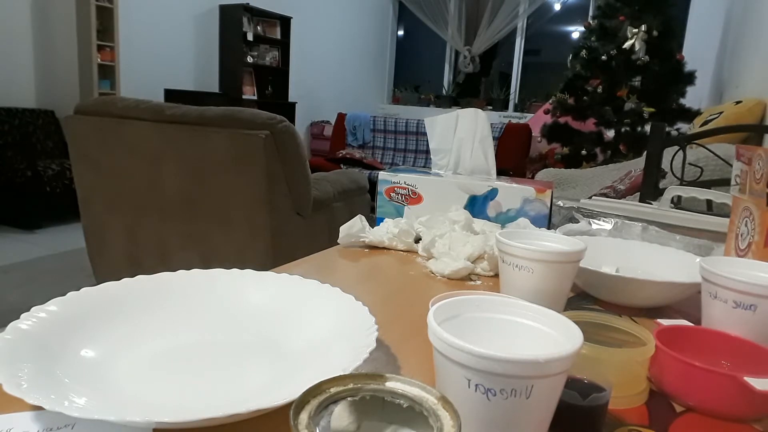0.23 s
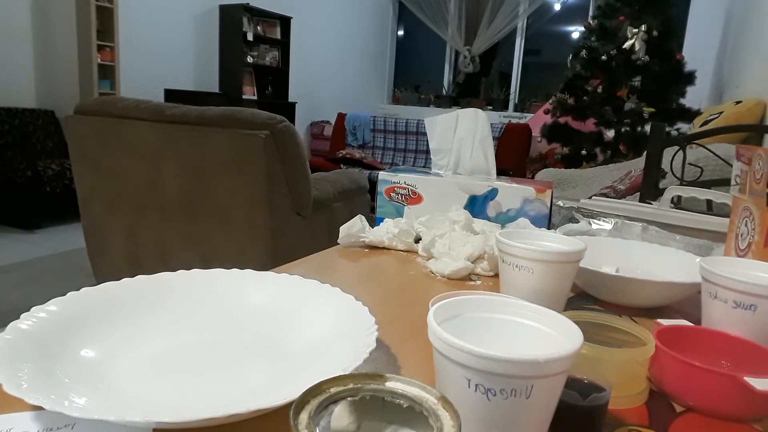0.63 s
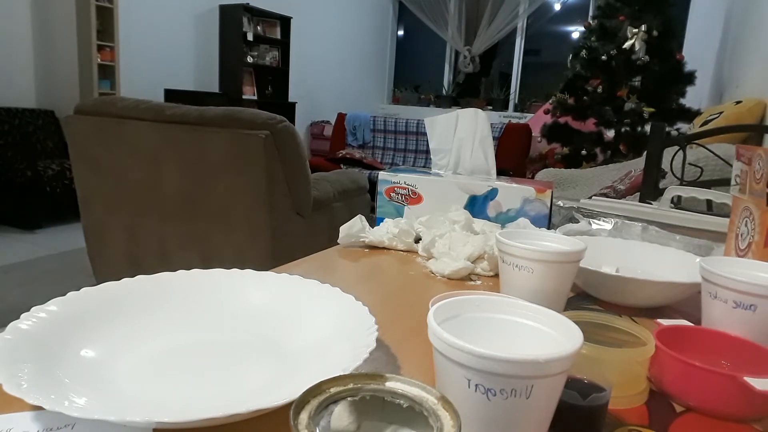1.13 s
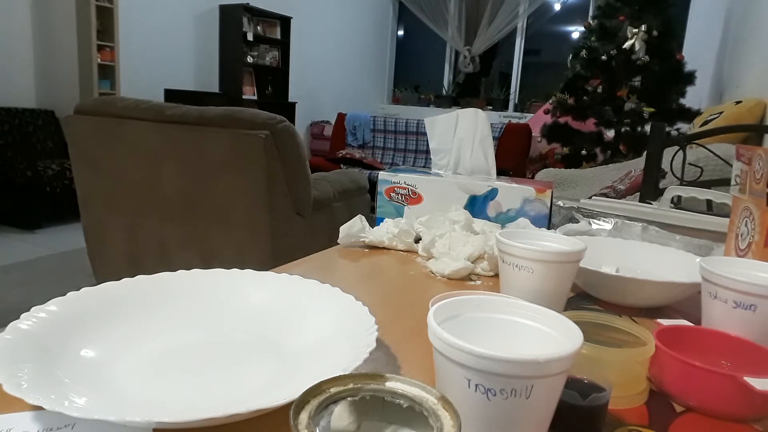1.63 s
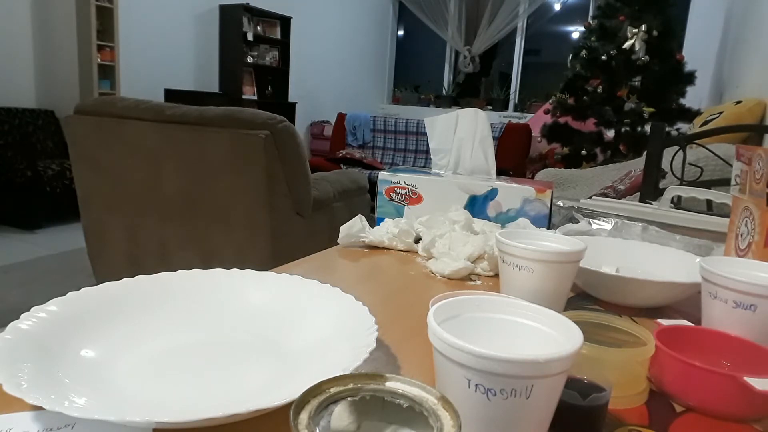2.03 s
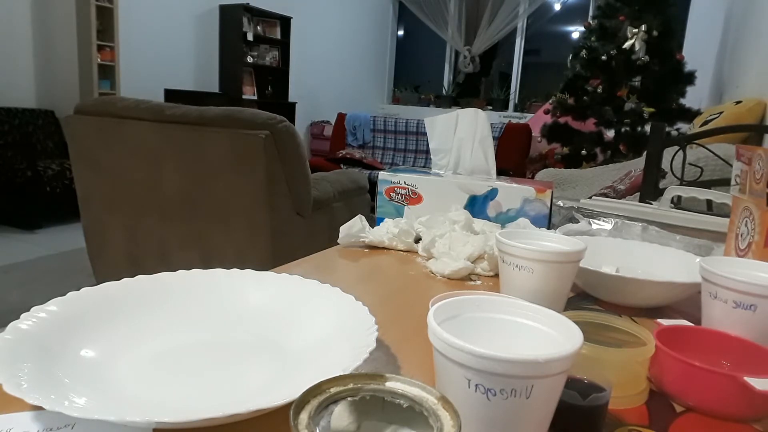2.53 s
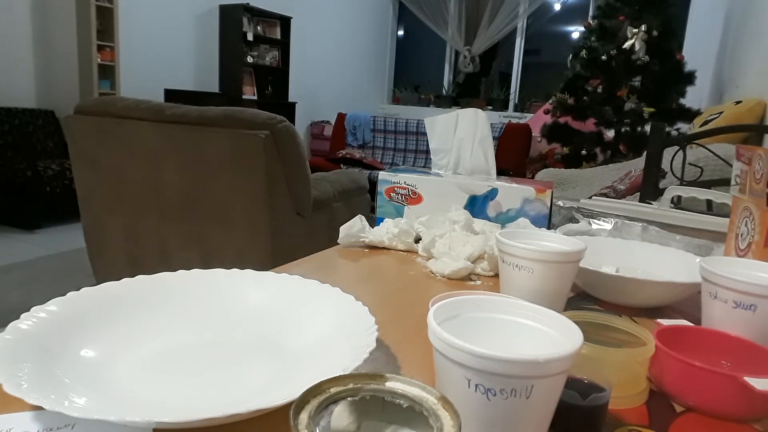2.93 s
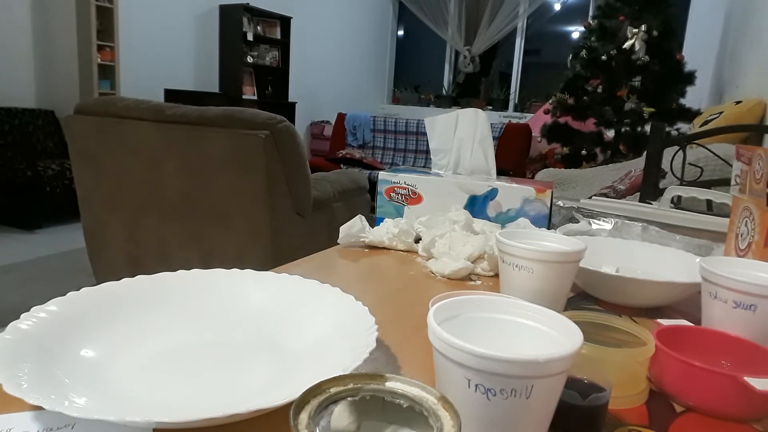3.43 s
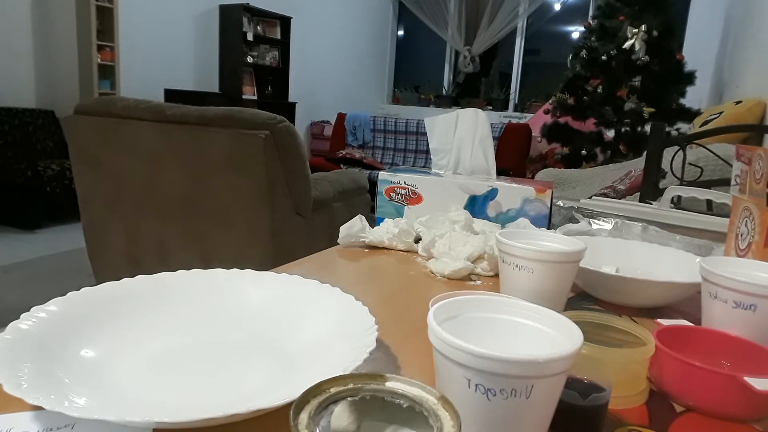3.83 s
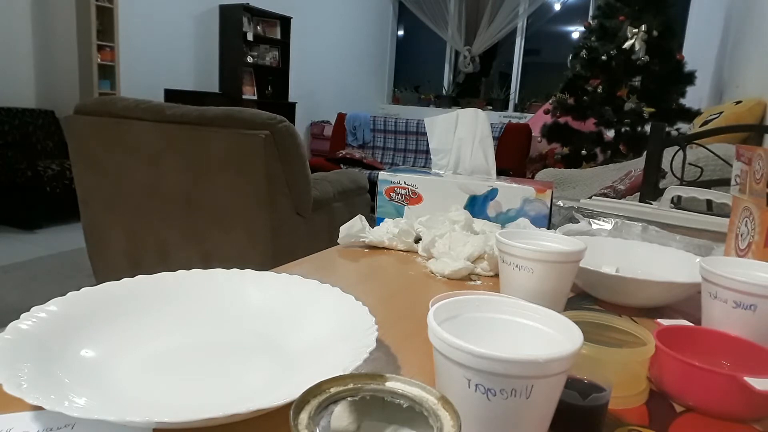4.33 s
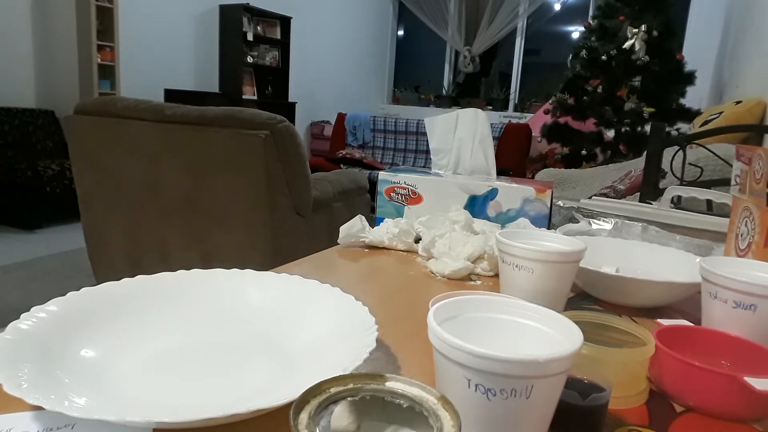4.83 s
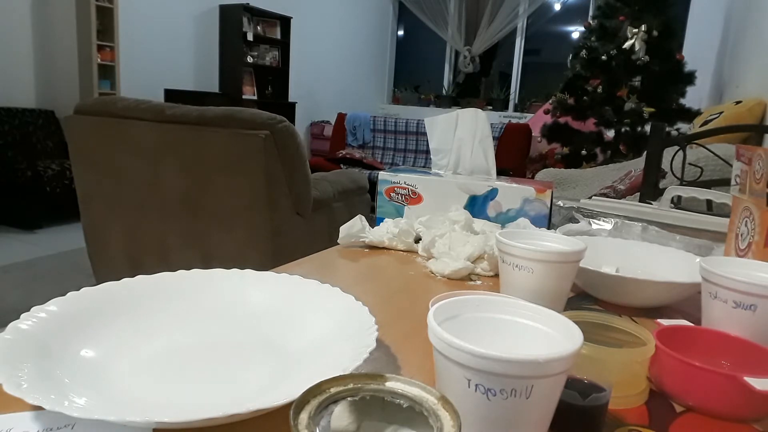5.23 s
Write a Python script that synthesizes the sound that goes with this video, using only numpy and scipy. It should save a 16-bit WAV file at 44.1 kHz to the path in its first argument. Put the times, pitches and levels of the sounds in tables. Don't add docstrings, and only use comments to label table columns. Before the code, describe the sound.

A still microphone in a furnished home room picks up faint rumble and hiss. A loose metal part clinks, something pushes the door softly, the handle clicks, and the door slams hard with a quick double strike and woody boom. After it, light knocks give way to irregular shoe steps, with sliding soles, chafing tones and crisp grit snaps, plus a late faint clink.

```python
import sys
import numpy as np
from scipy import signal
from scipy.fft import rfft, irfft, next_fast_len
from scipy.io import wavfile
from scipy.ndimage import uniform_filter1d, map_coordinates

SR = 44100
rng = np.random.default_rng(int(sys.argv[2]) if len(sys.argv) > 2 else 0)


def log_audio(samples):
    frames = np.atleast_2d(samples).T
    limited = np.clip(frames, -1, 1)
    pcm = np.round(limited * 32767).astype(np.int16)
    wavfile.write(sys.argv[1], SR, pcm)


def convert_level_to_amplitude(level_db):
    exponent = np.asarray(level_db, float) / 20
    return 10 ** exponent


N = 241957
LONG = 28000
WHOLE = next_fast_len(N)
HZ = np.fft.rfftfreq(WHOLE, 1 / SR)


def unit(x):
    return x / np.sqrt(np.mean(x ** 2) + 1e-20)


def along(points, hz):
    f, v = np.transpose(points)
    return np.interp(np.log(hz + 1), np.log(f + 1), v)


def coloured(x, points):
    gain = convert_level_to_amplitude(along(points, np.fft.rfftfreq(4096, 1 / SR)))
    cepstrum = irfft(np.log(gain + 1e-6))
    cepstrum[1:2048] *= 2
    cepstrum[2049:] = 0
    impulse = irfft(np.exp(rfft(cepstrum)))
    return signal.fftconvolve(x, impulse)[:len(x)]


def shaped(x, gain):
    return irfft(rfft(x, WHOLE) * gain, WHOLE)[..., :N]


def wobble(rate):
    knots = rng.standard_normal(int(N * rate / SR) + 4)
    return map_coordinates(knots, [np.arange(N) * rate / SR])


def swell_in(rise):
    return 1 - np.exp(-np.arange(LONG) / SR / rise)


def add(track, s, x):
    track[round(s * SR):][:len(x)] += x


def roomed(x, wet_db, rise=0.0023, size=0):
    # (frequency [Hz], t60 [s])
    room_t60 = [(70, 1), (250, 0.97), (1000, 0.68), (3000, 0.69), (6000, 0.56), (10000, 0.39),
                (15000, 0.42)]
    hz, t, z = signal.stft(rng.standard_normal(LONG), SR, nperseg=256)
    decay = convert_level_to_amplitude(-60 * t / along(room_t60, hz)[:, None])
    tail = signal.istft(z * decay, SR, nperseg=256)[1][:LONG]
    tail = tail * (1 - np.exp(-np.arange(len(tail)) / SR / rise))
    tail = convert_level_to_amplitude(wet_db) * tail / np.linalg.norm(tail)
    if size:
        colour = np.sqrt(np.abs(uniform_filter1d(np.abs(rfft(x)) ** 2, size)))
        return x + irfft(colour * rfft(tail), LONG)
    return x + signal.fftconvolve(x, tail)[:len(x)]


def burst(points, t60, rise, click=0.):
    t = np.arange(LONG) / SR
    shape = swell_in(rise) * convert_level_to_amplitude(-60 * t / t60) + click * convert_level_to_amplitude(-60 * t / 0.0038)
    x = coloured(rng.standard_normal(LONG) * shape, points)
    return x / np.abs(x).max()


def ring(modes, blur_hz):
    t = np.arange(LONG) / SR
    out = np.zeros(LONG)
    for hz, db, t60 in modes:
        drift = np.cumsum(rng.standard_normal(LONG)) * np.sqrt(2 * np.pi * blur_hz / SR)
        level = convert_level_to_amplitude(db + rng.normal(0, 2) - 60 * t / t60)
        out += level * np.sin(2 * np.pi * hz * t + drift)
    return out


def slam():
    # (time [s], peak [dB], panel boom [dB], rise [s])
    contacts = [
        (1.791, -25.5, -23, 0.0039),
        (1.806, -19, -3.5, 0.0011),
        (1.811, -25.5, 6, 0.0068),
        (1.821, -27.5, 7, 0.0023),
        (1.84, -34, 13, 0.0036),
        (1.862, -35, 10, 0.0021),
    ]
    # (frequency [Hz], density [dB per Hz])
    panel = [(24, -47), (40, -7), (145, -12), (210, -12), (327, -7), (480, -4), (890, -2), (980, -6.5),
             (1120, -2.5), (2240, -11.5), (2620, -66), (3300, -12), (4000, -40), (5200, -55), (8800, -120)]
    # (frequency [Hz], density [dB per Hz])
    strike = [(350, -25), (600, -14.5), (1320, -14), (1600, -1), (2190, -4.5), (2830, -3), (4090, -6),
              (4490, -11.5), (9500, -15.5), (15500, -42)]
    # (frequency [Hz], level [dB], t60 [s])
    latch = [(3680, 3, 0.33), (3600, -14, 1.2), (4037, -24, 0.63), (5650, -13.5, 0.81), (5660, -23, 0.26),
             (7320, 7, 0.11), (7600, -11, 0.29), (8200, 3, 0.19), (9300, -3, 0.035)]
    # (frequency [Hz], level [dB], t60 [s])
    thud = [(71.4, -43, 1), (147, -47, .45), (324.7, -22.5, 0.28), (418, -28, 0.51)]
    out = np.zeros(N + LONG)
    for s, db, boom_db, rise in contacts:
        hit = burst(strike, 0.054, rise)
        hit = hit + convert_level_to_amplitude(-31) * ring(latch, blur_hz=90)
        hit = hit + convert_level_to_amplitude(boom_db) * burst(panel, 0.071, rise)
        add(out, s, convert_level_to_amplitude(db) * roomed(hit, size=120, wet_db=0.5))
    add(out, 1.812, swell_in(0.012) * ring(thud, blur_hz=5.3))
    return out[:N]


def bump():
    # (time [s], peak [dB])
    bumps = [
        (1.196, -35.5),
    ]
    # (frequency [Hz], density [dB per Hz])
    body = [(24, -63), (40, -10), (82, -1.5), (199, 0), (257, -3.5), (374, -1), (446, -7), (517, -19),
            (576, -16), (633, -15.5), (1000, -27), (1300, -54), (2200, -120)]
    # (frequency [Hz], level [dB], t60 [s])
    knock = [(100, -55, 0.35), (153.3, -41.5, 0.61), (269, -46, 0.23), (352.5, -43, 0.4)]
    out = np.zeros(N + LONG)
    for s, db in bumps:
        add(out, s, convert_level_to_amplitude(db - 5.5) * roomed(burst(body, 0.24, rise=0.013), wet_db=3))
        add(out, s, swell_in(0.0081) * ring(knock, blur_hz=3.2))
    return out[:N]


def clinks():
    # (time [s], level [dB], ring length [share], lift of all modes [dB])
    strikes = [
        (0.8544, -61.5, 0.89, -1.5),
        (0.8619, -52.5, 0.77, 3.5),
        (0.9672, -68, 0.78, 0.5),
        (4.8618, -59, 1.0, 5),
        (4.8848, -58, 1.0, -6),
    ]
    # (frequency [Hz], level [dB], t60 [s])
    key = [(2190, -12, 0.05), (3500, -9, 0.056), (3560, -14, 0.1), (4600, -24, 0.015), (5800, -20, .03),
           (8753, -23, .02)]
    out = np.zeros(N + LONG)
    for s, db, share, modes_db in strikes:
        modes = [(hz, level + modes_db * (level < 0), t60 * share) for hz, level, t60 in key]
        add(out, s, convert_level_to_amplitude(db - 3) * roomed(ring(modes, blur_hz=110), wet_db=2))
    return out[:N]


def taps():
    # (time [s], peak [dB], centre [Hz], low [dB], high [dB])
    rattles = [(0.858, -58, 2200, -8, -8), (1.196, -46.5, 1300, -2, -2), (1.202, -40.5, 2100, 2, -41),
               (1.468, -56, 915, -7, -26), (1.525, -48, 1840, -2, -7), (1.553, -43, 2100, 9, -20),
               (1.567, -33, 2670, -19, -11), (1.6, -43, 2190, -8, -7), (2.211, -36, 2760, -16, -14),
               (2.346, -40.5, 3200, -15, -6), (2.401, -39.5, 2650, -11, -27),
               (2.502, -38.5, 1170, -14, -38), (2.506, -30.5, 1020, -2.5, -67)]
    # (time [s], peak [dB], centre [Hz], low [dB], high [dB])
    heels = [(2.774, -47, 1120, -28, -24), (2.798, -44, 1440, -18, -22), (2.838, -32, 2260, -22, -13.5),
             (3.2575, -36.5, 3560, -14, -3), (3.382, -29, 1160, -33, -6.5), (3.39, -30.5, 1100, -3, -10),
             (3.872, -44, 1150, -26, -22), (3.9095, -35.5, 1900, -23, 5), (3.915, -32.5, 2600, -5, -12),
             (4.223, -46, 1190, -18, -14), (4.289, -32.5, 1880, -22.5, -6), (4.412, -29.5, 2450, -11, -17),
             (4.945, -38.5, 1030, -14, -24), (4.975, -35, 1020, -20, -17), (5.41, -41, 2100, -9, -9)]
    out = np.zeros(N + LONG)
    for rows, t60 in ((rattles, 0.042), (heels, 0.072)):
        for s, db, hz, low_db, high_db in rows:
            colour = [(100, low_db + 3), (450, low_db), (0.87 * hz, -3), (hz, 0), (1.32 * hz, -3),
                      (7200, high_db), (9800, high_db - 5.5), (11000, high_db - 15), (16000, high_db - 31)]
            tap = burst(colour, t60, rise=0.00069, click=0.63)
            add(out, s, convert_level_to_amplitude(db - 4) * roomed(tap, size=400, wet_db=-2.5))
    return out[:N]


def pressure():
    # (time [s], sliding time [s], level [dB], bright [dB], dull [dB])
    slides = [(1.2, 0.08, -56.5, -25, 0), (1.466, 0.018, -57, -16, -17), (1.567, .03, -50, -19, 1),
              (2.214, 0.032, -51, -9, -16), (2.35, .02, -50.5, -10, -11), (2.507, .008, -61, -20, 1),
              (2.84, 0.21, -46.5, -9.5, -5), (3.259, 0.18, -44.5, -15, -10.5),
              (3.385, 0.1, -46.5, -7.5, -21), (3.875, 0.06, -46, -15, -6), (3.908, 0.17, -46, -13, -15),
              (4.224, 0.023, -54.5, -9, -22), (4.292, 0.064, -43, -9, -10.5), (4.415, 0.11, -47, -13, -7),
              (4.948, 0.025, -49.5, -14, -1), (4.978, .08, -42.5, -15.5, -24),
              (5.415, .08, -48.5, -13.5, -10)]
    # (peak time [s], swelling time [s], level [dB], bright [dB], dull [dB])
    drags = [(1.43, 0.18, -64.5, -16, 0), (1.55, .04, -55, -7, 5.5), (2.1, 0.13, -60, -8, 1),
             (2.2, 0.068, -60, -14, -2), (2.33, 0.042, -62, -5, -1), (2.406, 0.03, -50.5, -7.5, -9),
             (2.809, 0.091, -56, -15, -8), (2.826, .015, -67, -6, -15), (3.215, 0.088, -50, -8.5, -7),
             (3.76, 0.027, -60, -7, -24), (3.86, 0.19, -60, -15, -25), (4.024, 0.13, -51.5, -2.5, -5),
             (4.2, 0.083, -75, -1, -8), (4.548, 0.29, -46.5, -6.5, -6), (4.93, 0.095, -55, -9.5, -20),
             (5.095, .04, -42, -8, -11)]
    sag_db_per_s, lift_db_per_s, drag_off_db_per_s = 48, 156, 186
    step = 16
    t = np.arange(0, N + step, step) / SR
    power = (t > 1.7) * convert_level_to_amplitude([[-120], [-73.5], [-73.5]]) ** 2
    for s, length, db, high_db, low_db in slides:
        u = np.maximum(t - s, 0)
        fall_db = sag_db_per_s * np.minimum(u, length) + lift_db_per_s * np.maximum(u - length, 0)
        level = np.minimum(u / 0.0018, 1) * convert_level_to_amplitude(db - fall_db)
        rasp = convert_level_to_amplitude(6.5 * np.exp(-u / 0.0046))
        power += (level * [convert_level_to_amplitude(low_db) + 0 * u, np.sqrt(rasp), convert_level_to_amplitude(high_db) * rasp]) ** 2
    for s, length, db, high_db, low_db in drags:
        level = np.clip(1 + (t - s) / length, 0, 1)
        level = level * convert_level_to_amplitude(db - drag_off_db_per_s * np.maximum(t - s, 0))
        power += (level * convert_level_to_amplitude([[low_db], [0], [high_db]])) ** 2
    return np.array([np.interp(np.arange(N) / SR, t, part) for part in np.sqrt(power)])


def scuffs():
    # (frequency [Hz], level [dB])
    sole = [(240, -18), (400, 4), (438, -5.5), (496, -2.5), (738, -4), (1170, -3.5), (1590, -10.5),
            (2150, -6), (9210, -14), (10900, -16), (15500, -24)]
    big_slips = np.minimum(rng.exponential(size=N), 3) * (rng.random(N) < .03)
    slips = rng.standard_normal(N) * (1 + 0.6 * big_slips)
    slips = slips * convert_level_to_amplitude(1.5 * wobble(60) + 1.5 * wobble(20))
    strength = pressure()
    f, t, z = signal.stft(coloured(slips, sole), SR, nperseg=512)
    pressed_db = 20 * np.log10(np.interp(t, np.arange(N) / SR, strength[1]) + 1e-6)
    centre = np.clip(1704 + 7 * (pressed_db + 38.5), 1100, 2200)
    hollow = convert_level_to_amplitude(5 / (1 + ((f[:, None] - centre) / (0.23 * centre)) ** 2))
    patches = uniform_filter1d(rng.standard_normal(z.shape), size=3, axis=0)
    patches = unit(uniform_filter1d(patches, size=4, axis=1))
    rub = signal.istft(z * hollow * convert_level_to_amplitude(2.5 * patches), SR, nperseg=512)[1][:N]
    low = 1 / (1 + (HZ / 900) ** 6)
    high = 1 / (1 + (4800 / (HZ + 1)) ** 6)
    parts = [unit(shaped(rub, band)) for band in (low, 1 - low - high, high)]
    return roomed(convert_level_to_amplitude(-5.5) * (strength * parts).sum(axis=0), wet_db=-6)


def chafes():
    # (time [s], frequency [Hz], level [dB], rise [s], t60 [s])
    catches = [(1.548, 2224, -46.5, .003, 0.11), (1.6, 2200, -56, .01, 0.1), (3.205, 1364, -43, .005, 0.11),
               (1.568, 6750, -51, 0.0025, 0.099), (2.348, 9400, -45, .002, 0.028),
               (2.99, 649.5, -46, 0.026, 0.3), (2.85, 992, -45, 0.0051, 0.14),
               (3.27, 2050, -40.5, 0.037, 0.29), (3.347, 1173, -43.5, 0.0065, 0.31),
               (3.93, 1130, -37, 0.018, 0.16), (4.291, 1870, -42.5, 0.0056, 0.27),
               (4.42, 2240, -55, .01, 0.13), (4.88, 3560, -50, 0.0045, 0.073), (4.98, 7600, -50, .003, .06),
               (4.98, 1084, -39, 0.016, 0.19), (5.08, 1260, -43, .015, 0.086),
               (5.095, 2700, -41, 0.014, 0.19)]
    out = np.zeros(N + LONG)
    for s, hz, db, rise, t60 in catches:
        tone = swell_in(rise) * ring([(hz, db, t60)], blur_hz=0.09 * hz)
        add(out, s, roomed(tone, wet_db=-6))
    return out[:N]


def snaps():
    # (time [s], peak [dB])
    cracks = [(1.552, -42), (1.8096, -7), (2.348, -38), (2.2113, -39), (2.839, -28), (3.2577, -33),
              (3.3829, -24), (3.3838, -29), (3.3882, -23), (3.392, -21), (3.3994, -37), (3.873, -40),
              (3.9095, -27), (3.914, -24), (3.9244, -28), (4.2878, -28), (4.2923, -31), (4.3484, -29),
              (4.4125, -31), (4.415, -37), (4.5474, -31), (4.9436, -47), (4.945, -44), (5.1044, -32)]
    # (frequency [Hz], level [dB])
    snap_colour = [(300, -26), (1200, -8), (3000, 2), (6000, -10), (9800, -7), (11000, -24), (16000, -30)]
    pulses = np.zeros(N)
    for s, db in cracks:
        pulses[round(s * SR)] = convert_level_to_amplitude(db + 8) * rng.choice([-1, 1])
    return roomed(coloured(pulses, snap_colour), wet_db=-20)


def hum():
    # (frequency [Hz], density [dB per Hz])
    floor = [(12, -40), (20, -13), (38, -24.5), (77, -8), (193, -9.5), (277, -9), (328, -2.5), (422, -20),
             (607, -15), (698, -17.5), (873, -18.5), (1120, -25), (7310, -41.5), (14700, -43), (16000, -33)]
    # (frequency [Hz], width [Hz], lift [dB])
    room_modes = [(104.4, 7.4, 7.5), (144.5, 11, 8.5), (194, 7, 15), (237, 42, 3), (317, 33, 2.5),
                  (392.5, 14.5, 10)]
    # (time [s], level [dB])
    rumble = [(0, 2), (1.0, 2), (1.9, 4), (2.5, 1), (3.3, 4.5), (3.7, 2), (5.49, 2.5)]
    lift_db = sum(db / (1 + (2 * (HZ - hz) / width) ** 2) for hz, width, db in room_modes)
    noise = unit(shaped(rng.standard_normal(WHOLE), convert_level_to_amplitude(along(floor, HZ) + lift_db)))
    low = shaped(noise, 1 / (1 + (HZ / 700) ** 4))
    hiss = noise - low
    swell = convert_level_to_amplitude(np.interp(np.arange(N) / SR, *np.transpose(rumble)) + 0.61 * wobble(5))
    return convert_level_to_amplitude(-58) * (swell * low + convert_level_to_amplitude(1.5) * hiss)


def scene():
    # (frequency [Hz], level [dB])
    mic = [(20, -12), (45, -26), (70, -1), (9500, 1), (10600, -3.5), (13000, -2), (15000, 3)]
    door = slam() + bump() + clinks()
    steps = taps() + scuffs() + chafes() + snaps()
    return (coloured(door + steps, mic) + hum())[None]


def low_pass(x):
    return signal.sosfilt(signal.butter(12, 16470, fs=SR, output="sos"), x)


def record(dry):
    limited = shaped(dry, HZ < 15830)
    return low_pass(limited - .0005)


dry = scene()
out = record(dry)
log_audio(out)
```